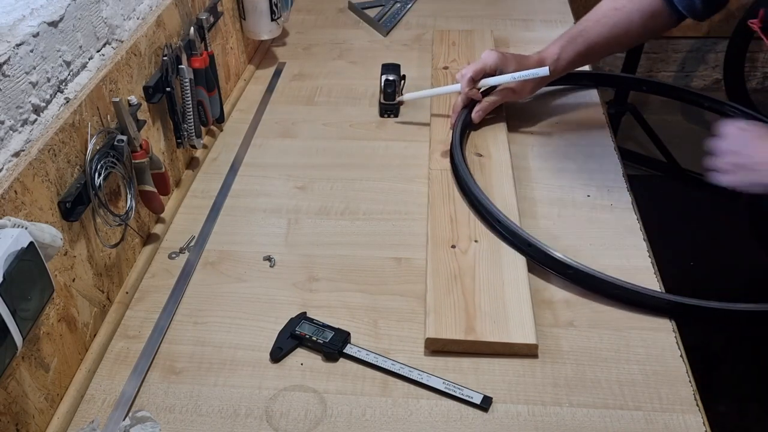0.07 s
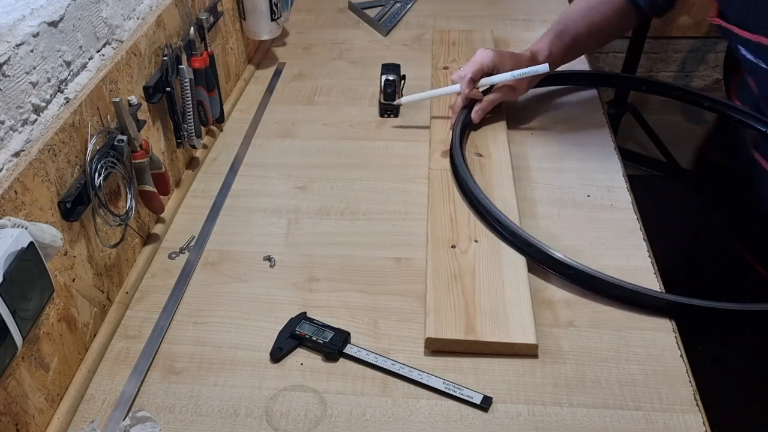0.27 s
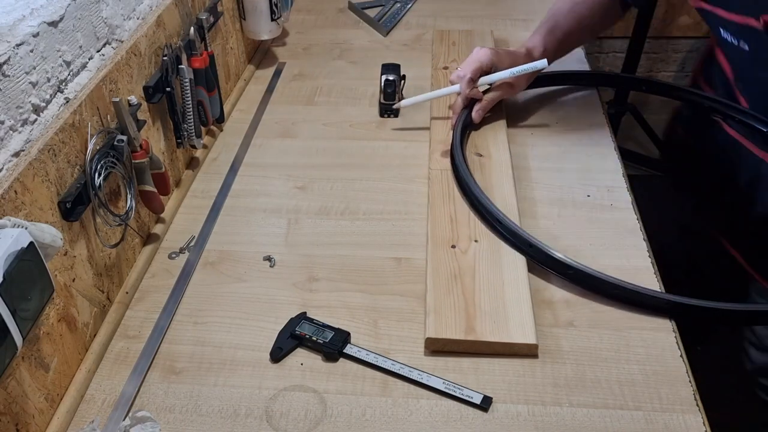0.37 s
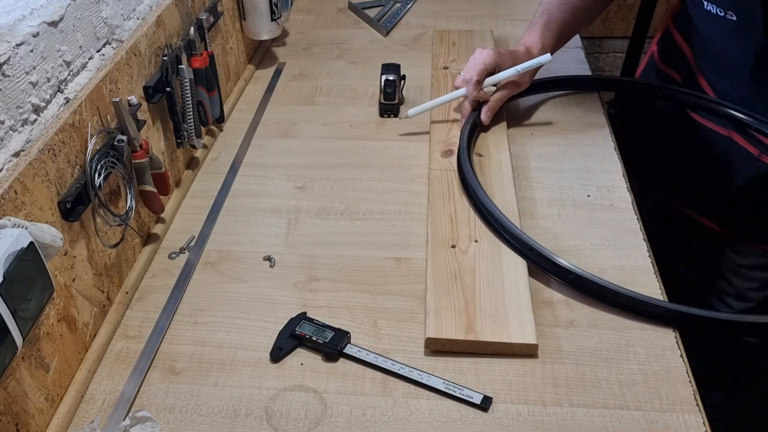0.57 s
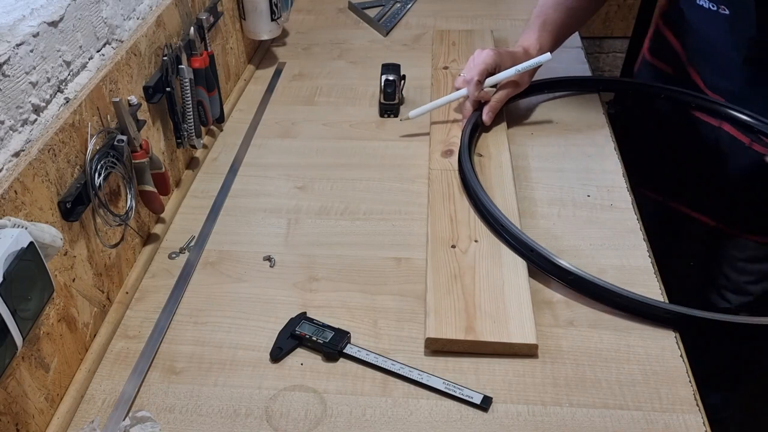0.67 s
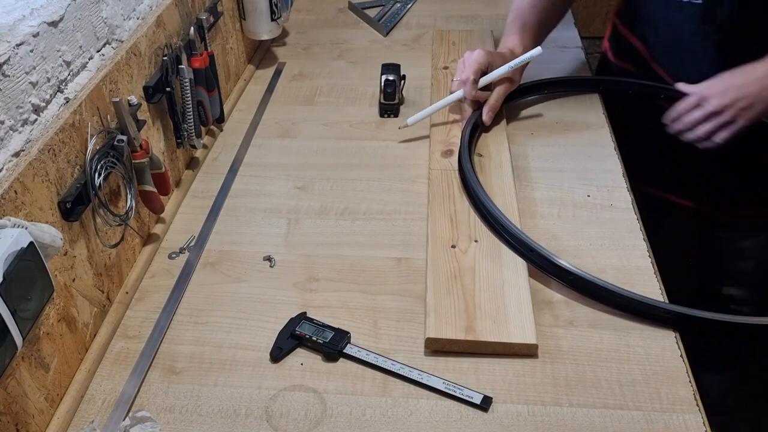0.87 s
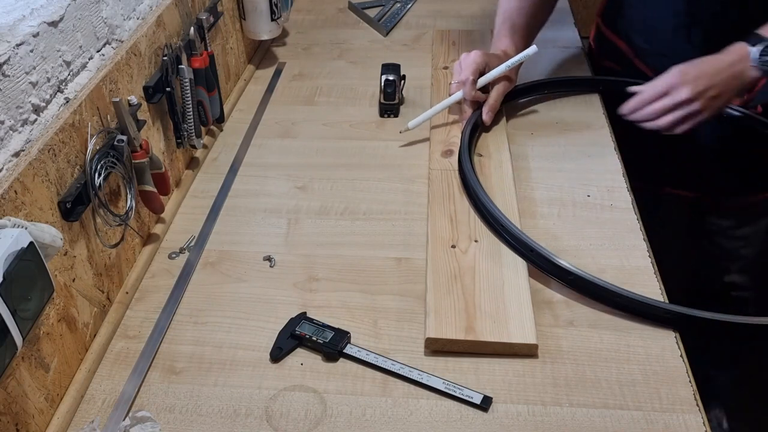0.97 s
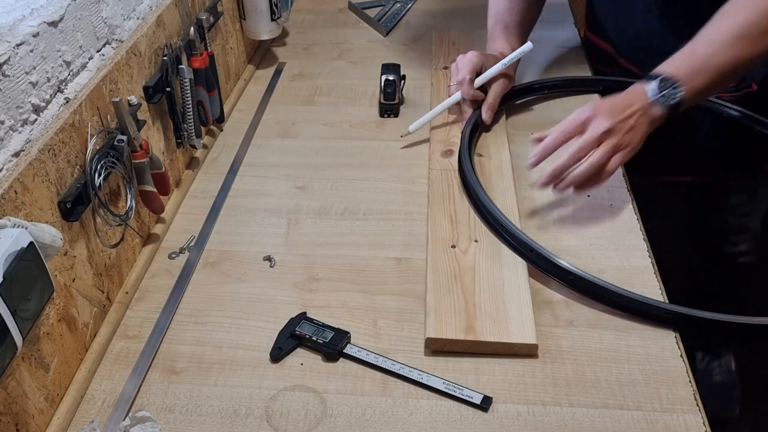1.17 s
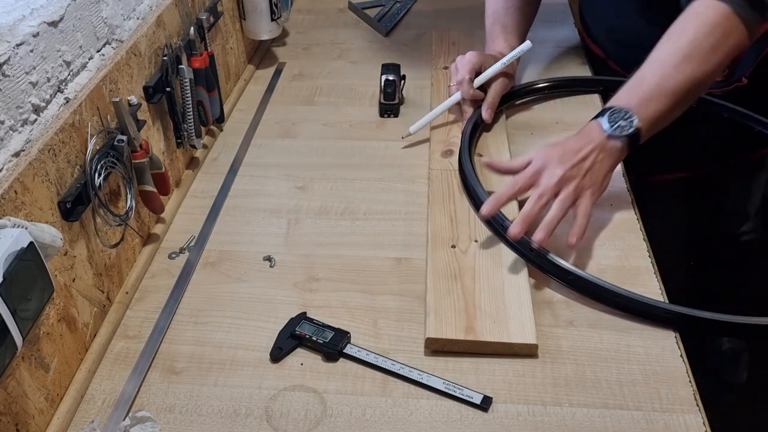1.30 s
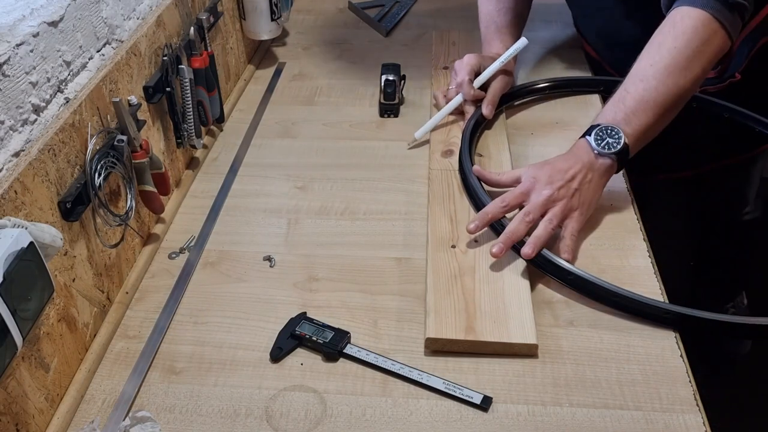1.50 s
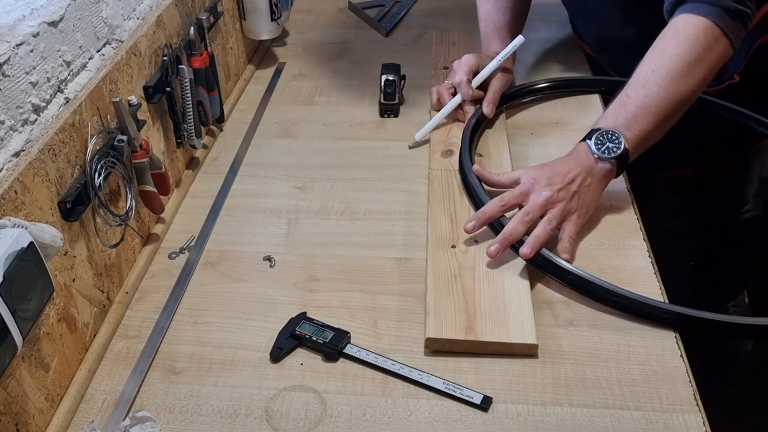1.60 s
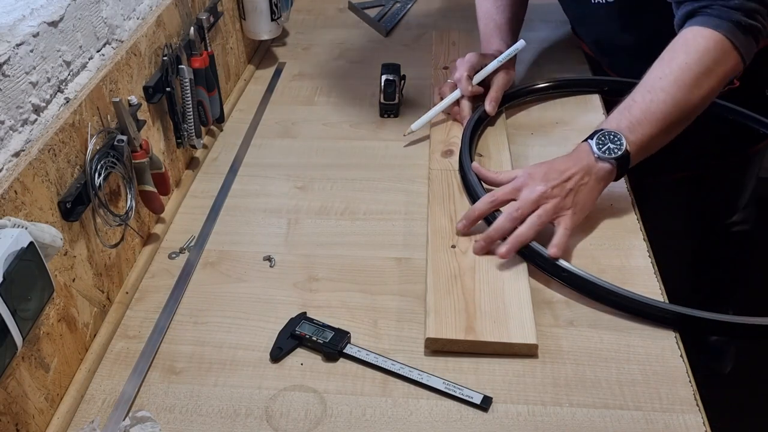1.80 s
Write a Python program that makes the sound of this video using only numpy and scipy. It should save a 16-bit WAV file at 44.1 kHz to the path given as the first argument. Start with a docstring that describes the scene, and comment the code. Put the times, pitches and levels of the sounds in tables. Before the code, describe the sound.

A wheel rim scrapes briefly and bumps on a wooden board, with low thuds.

```python
"""A low boom and a faint scrape come first: a wheel rim is dragged over a wooden board on a workbench.
The scrape is a dense stream of tiny slips that ring in the hollow rim. The rim bumps to rest and is
pressed down by a hand; each bump rings the board, and the weight sets the bench booming.
Fingers and a sleeve brush the rim in between. The small, quiet workshop scatters the sound."""
import sys
import numpy as np
from scipy import signal
from scipy.fft import rfft, irfft, next_fast_len
from scipy.io import wavfile
from scipy.ndimage import map_coordinates

SR = 44100
rng = np.random.default_rng(int(sys.argv[2]) if len(sys.argv) > 2 else 0)


def wav_record(signal):
    """Record a signal, one row per channel, as 16-bit PCM in the file named by sys.argv[1]."""
    frames = np.transpose(np.atleast_2d(signal))
    bounded = np.clip(frames, -1, 1)
    # unit amplitude maps onto the largest positive 16-bit level
    quanta = np.round(bounded * 32767).astype(np.int16)
    wavfile.write(sys.argv[1], SR, quanta)


N = 81585

# A mode is a note an object rings at; t60 is the time a sound takes to fade by 60 dB.
# weight landing on the bench: t/s, main mode/dB, upper modes/dB, rocking/dB
BENCH_THUMPS = [(-.005, -48, -41, -92), (0.09, -55, -49.5, -61), (.15, -53.5, -63.5, -70),
                (.222, -39.5, -34, -41), (.307, -40.5, -45, -72), (0.433, -45.5, -39.5, -68),
                (0.493, -35.5, -84, -56), (0.535, -32.5, -71, -43), (0.585, -74, -33.5, -74),
                (0.764, -39.5, -41, -70), (0.782, -68, -27.5, -46), (1.089, -70.5, -60.5, -85),
                (1.355, -38.5, -69, -53), (1.416, -48, -49.5, -67), (1.562, -39.5, -57.5, -72.5),
                (1.6, -40, -37, -63.5), (1.744, -82.5, -54.5, -71.5)]
# the drag of the rim: t/s, level/dB, then added to that level: board/dB, rim ring/dB, top octave/dB
DRAG_CURVE = [(0, -71, 0.5, 4, 3), (.05, -65, 1, -6, -2), (.108, -65.5, -8, -20, 8),
              (.17, -60, -0.5, -11, 8), (.21, -59, 6, 3, 7.5), (.294, -58.5, -8.5, -6, 5),
              (.311, -44, -24.5, -15.5, 2), (.346, -42, -23.5, 4, 1.5), (.366, -46, -26.5, 0.5, 6.5),
              (.382, -39, -16, -2, -4), (.41, -35.5, -21, -1, 5.5), (.422, -30, -23, -10, -1.5),
              (.455, -31, -19.5, -17, 0.5), (.49, -33, -22.5, -14.5, -1), (.525, -38.5, -19.5, -9, -1.5),
              (.578, -56, 3, 6, -13), (.65, -59, -9.5, -8.5, -13), (.74, -68, -8, -7, -5.5),
              (.85, -82, 1, 7, -7), (1, -120, -3.5, -5, -5)]
# tone of the friction hiss: f/Hz, level/dB
HISS_SPECTRUM = [(200, -32.5), (800, -13.5), (1500, -5), (2400, -8), (3400, -3.5), (6200, -4), (8200, -9),
                 (10500, -15), (12800, -10), (16000, -14.5)]
# low tone of the board under the rim: f/Hz, level/dB
BODY_SPECTRUM = [(80, -32), (200, -13.5), (330, 2), (470, 2.5), (700, 0.5), (980, -3), (1400, -9),
                 (3000, -21.5)]
# modes of the rim: f/Hz, width/Hz, level/dB
RIM_MODES = [(1000, 110, -11.5), (1332, 55, -0.5), (1645, 48, 2), (1772, 70, 3), (1963, 78, 4.5),
             (2420, 230, -2), (2900, 60, 0), (3198, 260, -0.5), (3710, 60, 0), (3756, 90, -8),
             (4670, 50, -17), (4870, 60, -9)]
# clothes rustling as the arms move: t/s, level/dB
RUSTLE_CURVE = [(0, -66), (.7, -70.5), (.98, -83), (1.18, -84.5), (1.33, -100), (1.45, -82.5), (1.66, -100),
                (1.74, -75), (1.85, -65)]
# tone of the cloth: f/Hz, level/dB
CLOTH_SPECTRUM = [(100, -4.5), (400, 11), (900, -16.5), (2000, 2), (4500, -2), (8500, -17.5),
                  (16000, -14.5)]
# tone of the room's air: f/Hz, level/dB
AIR_SPECTRUM = [(25, -6), (45, 4.5), (66, 9), (95, 11.5), (140, -16), (300, -22), (1200, -18.5),
                (2500, -26), (5000, -31.5), (10000, -42.5), (16000, -37.5)]
# light slides of the rim: peak t/s, level/dB, rise/s, fall/s, band centre f/Hz, width/octaves
RIM_SLIDES = [(.05, -64.5, 0.067, 0.048, 3520, 0.2), (0.963, -73.5, 0.038, 0.048, 1990, 0.23),
              (1.382, -70.5, 0.021, .02, 3000, 0.64), (1.408, -60.5, .005, 0.013, 1900, 1.2),
              (1.432, -64.5, 0.0063, 0.013, 2400, 1.7), (1.484, -62.5, 0.0035, 0.026, 1580, 0.43),
              (1.83, -66.5, .045, .08, 3320, 1.8)]
# modes of the hollow inside the rim: f/Hz, width/Hz, level/dB
HOLLOW_MODES = [(405, 220, 0.5), (1435, 58, 1), (1882, 20, -2.5), (2638, 46, 4), (3144, 70, 0.5),
                (3887, 74, -2), (4150, 51, -1), (4500, 66, -17), (4965, 27, 5), (6130, 110, -1.5),
                (7300, 110, -4), (7900, 220, -6), (9440, 280, -8), (13030, 3900, -11.5)]
# the rim hitting the board: t/s, level/dB, bass/dB, treble/dB, t60 factor, attack/s, left-right/dB
RIM_BUMPS = [(.206, -48, -33, -9.5, 1.1, 0.00067, -6), (.414, -44, -24, 4.5, 0.27, 0.0013, 0),
             (0.478, -44.5, -17, -5.5, 2.94, 0.0012, -8.5), (.528, -43.5, 14, -18.5, 1.55, 0.0014, -2),
             (0.572, -50.5, 11, -15, 0.73, 0.0014, 3), (0.599, -61.5, 31, -17, 0.87, 0.0037, 2),
             (.761, -50.5, 4, 11.5, 1.16, 0.0022, -5), (.78, -56.5, -1, 9, 1.1, .007, 4),
             (1.355, -85, 40, -12, 1.07, .005, -7), (1.558, -41, -24, -8.5, 0.83, 0.00069, 0.5),
             (1.57, -47, 1.5, -16.5, 0.69, 0.0004, 2)]
# modes of the board, before each bump shapes them: f/Hz, level/dB, t60/s
BOARD_MODES = [(225.5, -4, 0.1), (311.6, -7, 0.094), (344, -8, .15), (488, -17, .15), (593, -9.5, .11),
               (715.7, 1.5, 0.11), (879, 8, 0.04), (1085, 6, 0.056), (1279, 1.5, .11), (1524, -4.5, 0.17),
               (1918, -2, 0.058), (2320, -7, .07), (3060, -4, 0.21)]
# tone of the crack in a bump: f/Hz, level/dB
CRACK_SPECTRUM = [(100, -16.5), (400, -10), (650, 5), (900, -6), (1300, 0.5), (2400, -8), (5000, -13.5),
                  (9000, -25.5), (16000, -40.5)]
# fingers and sleeve on the rim: t/s, level/dB, rise/s, t60/s, rim ring/dB, top octave/dB, left-right/dB
BRUSH_STROKES = [(0.894, -68, .04, 0.38, -4.5, -4, -1), (1.365, -73.5, 0.0073, 0.45, -19.5, 0.5, -0.5),
                 (1.409, -67.5, 0.0029, 0.24, -8, -3, -4), (1.482, -64.5, 0.0027, .18, 3.5, 0, 1),
                 (1.507, -57.5, 0.014, 0.117, 0.5, 5, -0.5), (1.555, -68, 0.02, 0.2, 6, 2.5, -0.5)]
# how long the workshop echoes: f/Hz, t60/s
ROOM_DECAY = [(150, .3), (1000, 0.2), (4000, 0.16), (15000, 0.2)]


def amp(db):
    """Turn decibels into a gain."""
    return 10 ** (np.asarray(db) / 20)


def unit(x):
    """Scale x to an average (rms) strength of 1."""
    return x / np.sqrt(np.mean(x ** 2) + 1e-20)


def along(points, hz):
    """Read (f/Hz, value) points on a log frequency axis."""
    f, values = np.transpose(points)
    return np.interp(np.log(hz + 1), np.log(f + 1), values)


def curves(rows):
    """Give each column after the time one value per sample."""
    times, *columns = np.transpose(rows)
    return [np.interp(np.arange(N) / SR, times, column) for column in columns]


def wobble(per_s):
    """A smooth curve through per_s random points a second."""
    return map_coordinates(rng.standard_normal(2048), [np.arange(N) * per_s / SR], mode="wrap")


def filtered(x, response):
    """Scale each frequency in x by response(frequency)."""
    n = x.shape[-1]
    padded = next_fast_len(n + 8192)
    return irfft(rfft(x, padded) * response(np.fft.rfftfreq(padded, 1 / SR)), padded)[..., :n]


def coloured(x, spectrum):
    """Give x the tone of a spectrum, at strength 1."""
    return unit(filtered(x, lambda hz: amp(along(spectrum, hz))))


def band(x, hz, octaves):
    """Favour the part of x near one pitch, at strength 1."""
    return unit(filtered(x, lambda f: 1 / (1 + (np.log2((f + 1) / hz) / octaves) ** 2)))


def fade(t, t60):
    """Die away by 60 dB every t60 seconds."""
    return np.exp(-np.log(1000) * t / t60)


def pan(db):
    """Left and right gains; positive db leans left."""
    return amp(np.array([[db], [-db]]) / 2)


def since(start):
    """Seconds since start, zero before it."""
    return np.maximum(np.arange(N) / SR - start, 0)


def stroke(peak_s, rise_s, t60):
    """Swell up to a peak, then die away."""
    return np.exp(np.minimum(np.arange(N) / SR - peak_s, 0) / rise_s) * fade(since(peak_s), t60)


def bench_boom(rise_s=0.011, left_lag_s=0.0004):
    """The bench top booms in its lowest modes whenever weight lands on it."""
    out = np.zeros((2, N))
    for start, main_db, upper_db, rock_db in BENCH_THUMPS:
        t = np.array([since(start + left_lag_s / 2), since(start - left_lag_s / 2)])
        modes = [(65, main_db, 0.55), (89.6, upper_db, 0.25),  # f/Hz, level/dB, t60/s
                 (105.15, upper_db - 18.5, 0.25), (38.5, rock_db, 0.25)]
        boom = sum(amp(db) * fade(t, t60) * np.sin(2 * np.pi * hz * t) for hz, db, t60 in modes)
        out += (1 - np.exp(-(t / rise_s) ** 2)) * boom
    return out


def friction(slips_per_s=7000, slip_share=0.21):
    """Tiny slips of random size over a smooth hiss, different at each ear."""
    slips = rng.standard_normal((2, N)) * (rng.random((2, N)) < slips_per_s / SR)
    return np.sqrt(slip_share) * unit(slips) + np.sqrt(1 - slip_share) * rng.standard_normal((2, N))


def streaked(x, t60=0.042, ring_db=-5.5):
    """Add a short random ring, like close early echoes in the room, that streaks the tone with many thin peaks."""
    t = np.arange(SR // 10) / SR
    ring = rng.standard_normal(len(t)) * fade(t, t60)
    streaks = signal.fftconvolve(x, ring[None] / np.linalg.norm(ring), axes=1)[:, :N]
    return unit(x + amp(ring_db) * streaks)


def ringing(x, modes, contrast=0.19):
    """Let x ring a set of modes; contrast makes their peaks stand out more."""
    def response(f):
        peaks = sum(amp(db) * 1j * f * width / (hz * hz - f * f + 1j * f * width)
                    for hz, width, db in modes)
        return peaks * np.abs(peaks) ** contrast
    return unit(filtered(x, response))


def scrape(top_hz=9000, judder_db=0.65):
    """The rim judders over the grain of the wood: it hisses, and both board and rim ring."""
    level_db, body_db, rim_db, top_db = curves(DRAG_CURVE)
    hiss = coloured(streaked(friction()), HISS_SPECTRUM)
    top = filtered(hiss, lambda f: f ** 4 / (f ** 4 + top_hz ** 4))
    hiss += (amp(top_db) - 1) * top
    board = amp(body_db) * coloured(streaked(friction()), BODY_SPECTRUM)
    rim = amp(rim_db) * ringing(friction(), RIM_MODES)
    return (hiss + board + rim) * amp(level_db + judder_db * wobble(per_s=110)) * pan(db=-1.5)


def rustle():
    """Cloth rubs softly as the arms move."""
    return amp(curves(RUSTLE_CURVE)[0]) * coloured(friction(), CLOTH_SPECTRUM)


def room_tone(air_db=-66, drone_hz=64.6, drone_db=-63, waver_db=0.5):
    """Faint air and a low, wavering drone."""
    drone = np.sqrt(2) * np.sin(2 * np.pi * drone_hz * since(0))
    drone *= amp(drone_db + waver_db * wobble(per_s=7))
    return amp(air_db) * coloured(rng.standard_normal((2, N)), AIR_SPECTRUM) + drone


def slides():
    """The rim creeps under the hand, and the faint friction rings in its hollow."""
    out, t = np.zeros((2, N)), np.arange(N) / SR
    for peak_s, db, rise, fall, hz, octaves in RIM_SLIDES:
        swell = np.exp(-((t - peak_s) / np.where(t < peak_s, rise, fall)) ** 2 / 2)
        hollow = ringing(friction(), HOLLOW_MODES, contrast=0.36)
        out += amp(db) * swell * band(hollow, hz, octaves)
    return out


def bumps(bass_hz=500, treble_hz=2600, crack_db=-3, crack_t60=0.15, click_t60=0.016):
    """Each bump makes a crack and rings the board: bassy if it lands flat, bright on an edge."""
    out = np.zeros((2, N + SR))
    t = np.arange(SR // 3) / SR
    hz, mode_db, t60 = np.transpose(BOARD_MODES)[:, :, None]
    for start, db, bass_db, treble_db, length, attack, side_db in RIM_BUMPS:
        def tone(f):
            bass = bass_db / (1 + (f / bass_hz) ** 3)
            treble = treble_db * f ** 2 / (f ** 2 + treble_hz ** 2)
            return amp(bass + treble)
        spread = np.minimum(hz / (2 * bass_hz), 1)  # high modes differ more between the ears
        phase = 2 * np.pi * (rng.random(hz.shape) + spread * rng.random((2,) + hz.shape))
        modes = amp(mode_db) * tone(hz) * fade(t, t60 * length) * np.sin(2 * np.pi * hz * t + phase)
        crack = filtered(coloured(rng.standard_normal((2, len(t))), CRACK_SPECTRUM), tone)
        crack *= fade(t, crack_t60 * length) + fade(t, click_t60)  # the click is the first contact
        hit = (modes.sum(1) / 2 + amp(crack_db) * crack) * (1 - np.exp(-t / attack))
        first = round(start * SR)
        out[:, first:first + len(t)] += amp(db) * pan(side_db) * hit
    return out[:, :N]


def brushes():
    """Fingers and a sleeve stroke the rim: a light hiss and ring that swell and die away."""
    out = np.zeros((2, N))
    for peak_s, db, rise, t60, rim_db, top_db, side_db in BRUSH_STROKES:
        thin_tone = [(900, -9), (1300, 0), (6000, 0), (10000, top_db)]  # f/Hz, level/dB
        hiss = coloured(coloured(friction(), HISS_SPECTRUM), thin_tone)
        rim = amp(rim_db) * ringing(friction(), RIM_MODES)
        out += amp(db) * pan(side_db) * stroke(peak_s, rise, t60) * (hiss + rim)
    return out


def flick(db=-66.5):
    """One quick, bright rub."""
    swell = stroke(peak_s=1.069, rise_s=0.0084, t60=0.21)
    return amp(db) * swell * band(friction(), hz=4820, octaves=0.33)


def workshop_echo(x, db=-9):
    """The small room scatters sound into a short tail, different at each ear."""
    hz, t, noise = signal.stft(rng.standard_normal((2, SR // 2)), SR, nperseg=256)
    tail = signal.istft(noise * fade(t, along(ROOM_DECAY, hz)[:, None]), SR, nperseg=256)[1]
    return amp(db) * signal.fftconvolve(x, tail / np.linalg.norm(tail[0]), axes=1)[:, :N]


def narrow_bass(x, mono_hz=260):
    """Long, low waves reach both ears alike."""
    mid = (x[0] + x[1]) / 2
    side = filtered((x[0] - x[1]) / 2, lambda hz: hz / np.hypot(hz, mono_hz))
    return np.array([mid + side, mid - side])


def scene():
    """The sounds of the rim in the room, over rustle, room tone and the bench's boom."""
    handling = scrape() + bumps() + brushes() + slides() + flick()
    return narrow_bass(handling + workshop_echo(handling) + rustle() + room_tone()) + bench_boom()


def record(dry, low_hz=39, top_hz=15900):
    """Cut the deepest bass and the very highest treble."""
    return filtered(dry, lambda hz: (hz < top_hz) * hz ** 4 / np.hypot(hz ** 4, low_hz ** 4))


dry = scene()
out = record(dry)
wav_record(out)
```